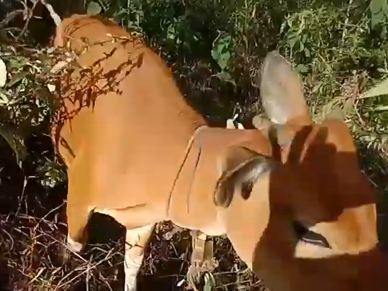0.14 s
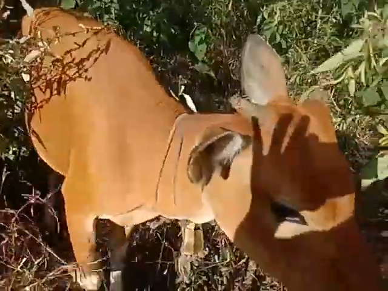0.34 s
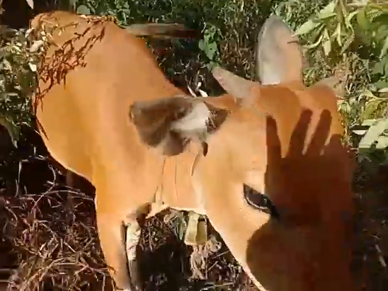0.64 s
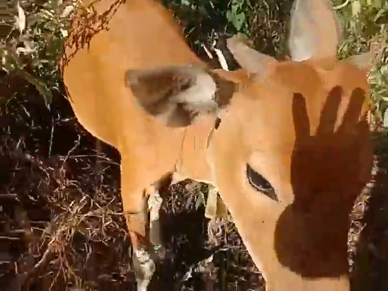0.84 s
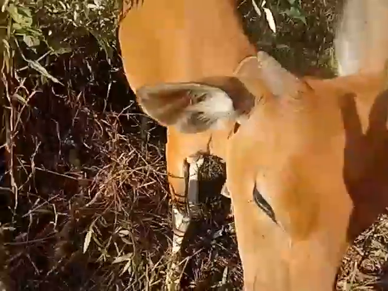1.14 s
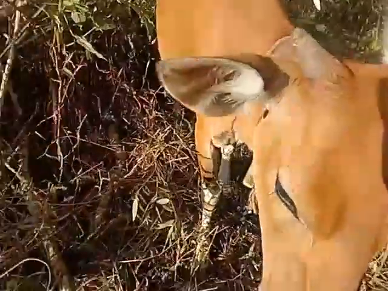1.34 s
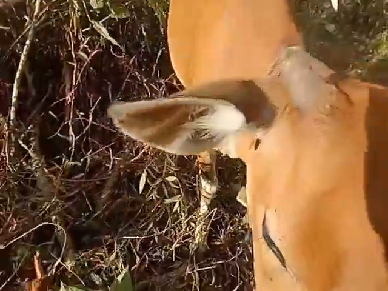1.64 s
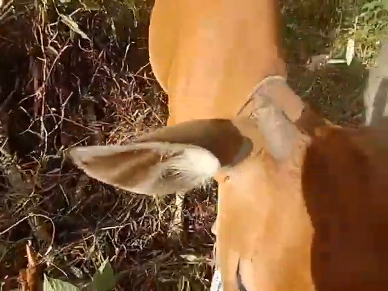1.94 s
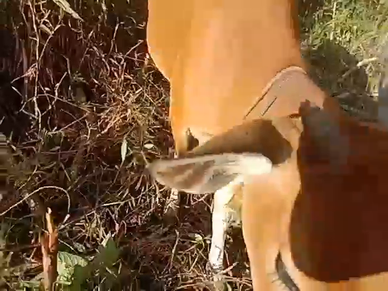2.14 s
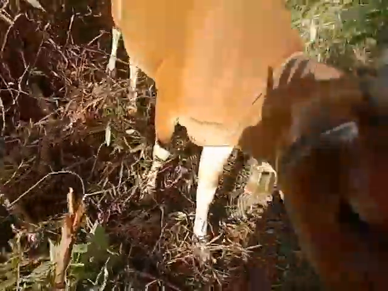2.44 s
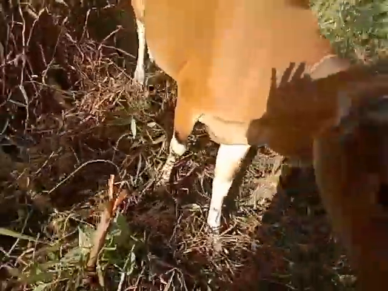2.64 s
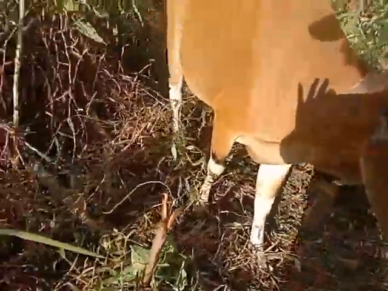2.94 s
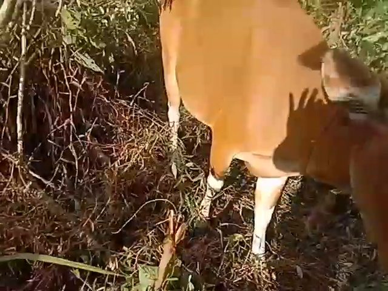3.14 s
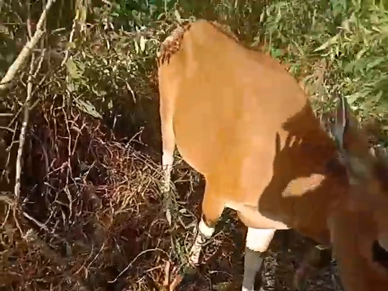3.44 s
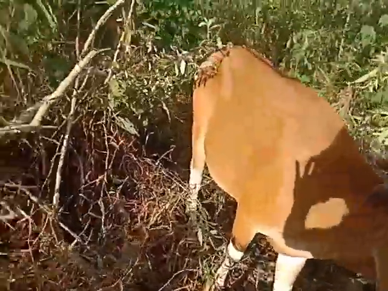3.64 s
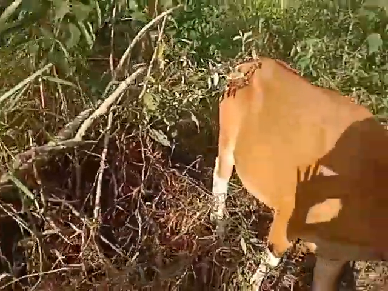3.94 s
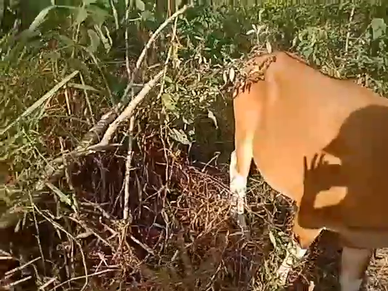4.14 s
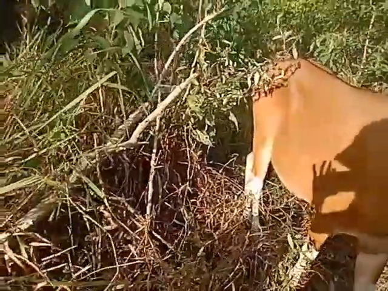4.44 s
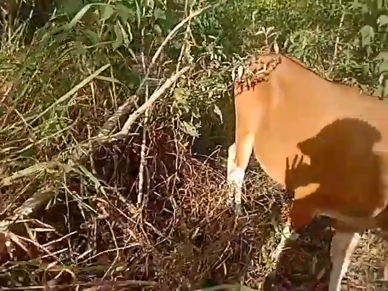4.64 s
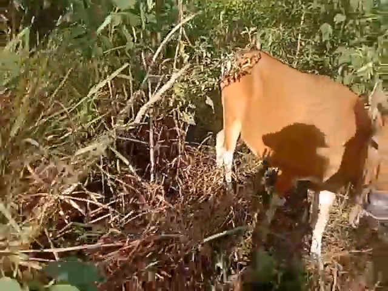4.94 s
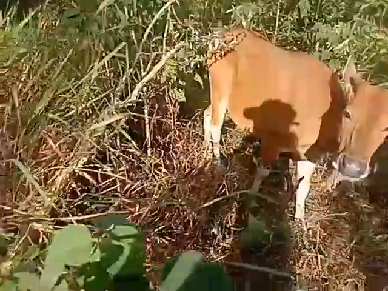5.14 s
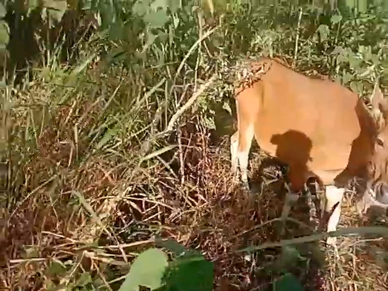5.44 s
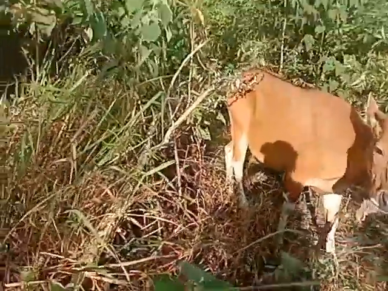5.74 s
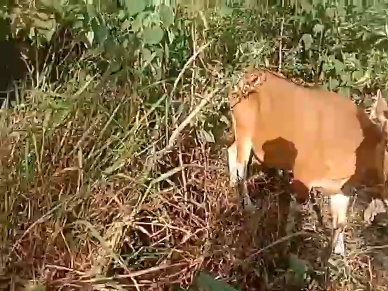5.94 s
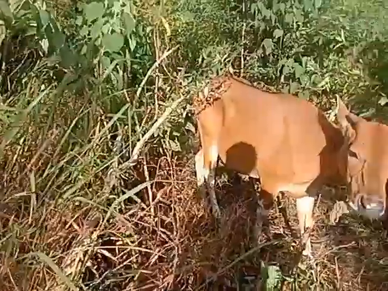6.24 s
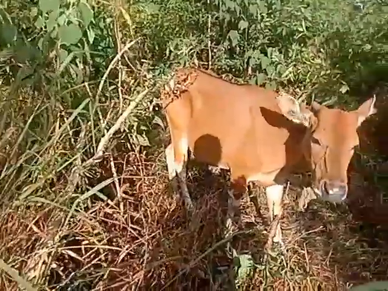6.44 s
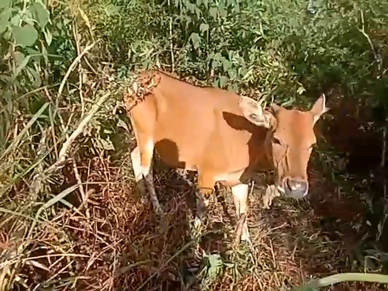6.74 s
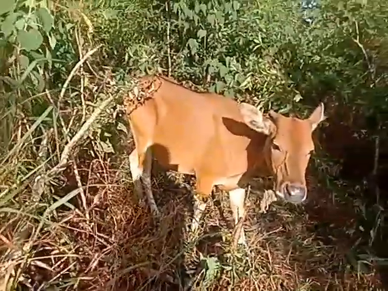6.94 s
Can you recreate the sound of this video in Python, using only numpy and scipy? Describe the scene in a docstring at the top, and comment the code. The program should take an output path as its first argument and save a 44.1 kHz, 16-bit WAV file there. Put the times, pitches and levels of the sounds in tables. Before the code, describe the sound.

A cow tugs at dry scrub, leaves swishing and stems snapping close by, over droning cicadas and a steady low hum.

```python
"""Leaves swish, stems crackle and snap, and a hoof thuds as a cow browses in dry scrub close by.
Cicadas drone all around, a low hum runs throughout, a far engine nearly holds its pitch and then slows,
and a bird whistles faintly. Plant sounds are noise and tiny clicks, shaped by filters and by each pull.
The hum, engine and bird are sine waves. The cicadas are a hiss of noise plus pulsed tones.
Rumble, air and a thin whine are filtered noise."""
import sys
import numpy as np
from scipy import signal
from scipy.fft import rfft, irfft, next_fast_len
from scipy.io import wavfile

SR = 44100
rng = np.random.default_rng(int(sys.argv[2]) if len(sys.argv) > 2 else 0)


def store_wav(level_fs):
    """Save 16-bit WAV to argv[1]."""
    pcm = np.round(np.clip(np.atleast_2d(level_fs), -1, 1) * 32767)
    wavfile.write(sys.argv[1], SR, pcm.T.astype(np.int16))


N = 313242
TIME = np.arange(N) / SR  # seconds

# In every spectrum table, each row: frequency in Hz, relative level in dB.
# The cow pulls at or pushes through the scrub. Each row: start in seconds, length in seconds,
# then relative levels in dB of leaves, stems and branches.
PULLS = [(-0.05, 0.063, -62, -63, -65), (0.05, .19, -54, -53, -62), (0.304, 0.22, -53.5, -57.5, -55),
         (0.484, 0.13, -47, -49, -62), (0.688, 0.048, -44, -41, -68), (1.308, .16, -57, -59, -61),
         (1.493, .12, -55, -50.5, -57), (1.604, 0.2, -50.5, -45.5, -58), (1.842, 0.15, -50, -49.5, -66),
         (1.978, 0.26, -53, -57.5, -64), (2.246, 0.14, -54.5, -52.5, -58), (2.403, .06, -55, -58, -58),
         (2.464, 0.43, -57, -58, -57), (3.074, 0.15, -53.5, -60.5, -60), (3.42, 0.13, -72, -58.5, -51),
         (3.556, 0.18, -52, -48, -45.5), (3.979, 0.063, -54, -50, -54), (4.062, 0.067, -53, -55.5, -55),
         (4.137, 0.34, -84, -82, -60.5), (4.628, 0.16, -77, -61.5, -57.5), (4.768, 0.12, -61, -54.5, -54.5),
         (4.965, 0.16, -50.5, -49.5, -53.5), (5.098, 0.071, -62, -43, -54),
         (5.206, 0.11, -53.5, -54.5, -56), (5.464, 0.14, -64, -61, -58), (5.574, 0.08, -49, -46.5, -62),
         (5.869, 0.1, -64, -60, -59), (6.43, 0.1, -61, -65, -78)]
# The scrub between pulls. One row: relative levels in dB of leaves, stems and branches.
REST_DB = (-74.5, -78, -59.5)
# Every pull takes hold, builds as the plant tightens, lets go, and leaves the bush swaying.
GRIP_S, BUILD_DB, RELEASE_S, SWAY_DB, SWAY_S = 0.023, 1, 0.037, -21, 0.43
# Spectra of thin leaves, of stems and of heavy branches.
LEAF_SPECTRUM = [(1500, 1), (4000, 4), (6000, 13), (8200, -2), (9500, 7), (11000, 5), (13700, -2),
                 (15200, 0.5)]
STEM_SPECTRUM = [(300, -48), (700, -10.5), (1300, 0.5), (2200, -2), (3100, -0.5), (3900, -2), (4400, -8.5),
                 (5200, 2.5), (7000, -14), (8500, -18), (15000, -23.5)]
BRANCH_SPECTRUM = [(200, -17), (340, 8), (520, -2), (800, 0), (1200, -3), (2000, -16.5)]
# Stems snapping; the rows from 1.189 to 1.255 s are sharp slips of the twig dragging over wood. # Each row:
# start in seconds, relative peak in dB, pitch in Hz, ring time in seconds, # splinters against the stalk in dB.
SNAPS = [(0.061, -41.5, 3880, 0.019, -8), (0.539, -32, 3780, 0.069, -6), (0.554, -31, 3630, 0.019, 3),
         (0.586, -33, 1300, 0.09, 19), (0.76, -31.5, 2990, 0.025, -11), (0.764, -32, 3420, 0.042, -12),
         (0.775, -31, 2860, 0.034, 3), (0.962, -46.5, 900, 0.021, 18), (1.189, -36, 1480, 0.018, -6),
         (1.212, -41, 2230, 0.04, -5), (1.215, -41.5, 1350, 0.11, -7), (1.243, -42, 1320, 0.059, -8),
         (1.255, -43, 1320, 0.024, -12), (1.675, -36.5, 3180, 0.049, -8), (1.77, -32, 1250, 0.03, 3),
         (1.773, -32.5, 3150, 0.033, -14), (1.777, -27, 1260, 0.0081, -3), (1.785, -31.5, 3100, 0.042, 1),
         (1.879, -36.5, 4060, 0.2, -8), (1.913, -40.5, 1790, 0.085, -11), (2.095, -41.5, 2980, 0.027, -10),
         (4.024, -42, 3300, 0.098, -8), (5.157, -31, 1530, 0.03, 13), (5.646, -39, 1280, 0.04, -6),
         (5.65, -31, 2190, 0.021, -4), (6.581, -43, 2720, 0.018, -11), (6.61, -46.5, 3200, 0.03, -5),
         (6.754, -45, 1240, 0.045, -3), (7.065, -50, 1410, 0.037, -4)]
# Dry leaves ticking. Each row: start in seconds, relative peak in dB, lower crack against the tick in dB.
TICKS = [(0.087, -48, 10.5), (0.619, -35.5, 0), (0.8624, -51, -7), (0.8905, -42.5, -15), (2.923, -39, -8),
         (3.186, -44, -5), (3.481, -51, -6), (3.924, -44, 7.5), (4.103, -39, 0.5), (5.0045, -45, -11),
         (5.3394, -47.5, 2), (5.4328, -51, 2), (5.514, -46, -22), (5.918, -45, -10), (6.326, -56, -9),
         (6.772, -56, -3), (7.022, -42, -16)]
# Dull knocks of wood. Each row: start in seconds, relative peak in dB, pitch in Hz, ring time in seconds.
KNOCKS = [(0.276, -46, 323, 0.09), (0.455, -47, 338, 0.096), (0.82, -42.5, 428, 0.046),
          (2.418, -43.5, 890, 0.051), (3.43, -47, 340, 0.098), (3.924, -24.5, 750, 0.012),
          (5.651, -42, 754, 0.046)]
# A twig dragging over wood: from when to when, how loud, how it fades.
SCRAPE_START_S, SCRAPE_END_S = 1.188, 1.268
SCRAPE_DB, SCRAPE_FADE_DB_PER_S = -50, 80
# A hoof pressing into the litter: when it lands, how it loads and fades, and its spectrum.
HOOF_S, HOOF_RISE_S, HOOF_HOLD_S = 5.125, 0.034, 0.04
HOOF_DB, HOOF_FADE_DB_PER_S = -40.5, 192
HOOF_SPECTRUM = [(100, -9), (220, 0), (300, 3), (390, -2.5), (500, -18), (900, -43)]
# Nearer cicadas. Each row: tymbal clicks a second, pitch in Hz, width in Hz, level in dB at the start,
# level in dB at the end.
CICADAS = [(91.6, 6600, 330, -70, -53), (102.5, 6800, 550, -52.5, -59), (84.9, 7050, 320, -57, -59.5),
           (91.9, 5750, 450, -56, -63)]
# Cicada chorus. Each row: time in seconds, relative level in dB; then its spectrum.
CHORUS_LEVEL = [(0.0, -44.5), (3.44, -46), (3.66, -44.5), (4.41, -47), (4.53, -45), (7.08, -45), (7.1, -45)]
CHORUS_SPECTRUM = [(3500, -74), (4600, -24.5), (5050, -15), (5350, -7), (5650, -1.5), (5950, -0.5),
                   (6220, -7), (6550, 4.5), (6850, -5.5), (7150, -2), (7450, -3.5), (7750, -13),
                   (8200, -25.5), (9500, -81)]
# Low hum and its central pitch. Each row: time in seconds, level in dB.
HUM_LEVEL = [(0.0, -36), (0.45, -32.5), (0.65, -35.5), (1.82, -32.5), (1.98, -35.5), (2.29, -31.5),
             (2.61, -36), (2.67, -32.5), (3.52, -33), (3.6, -30.5), (3.89, -34.5), (4.11, -32.5),
             (5.63, -32.5), (5.77, -30.5), (6.09, -33), (7.1, -31.5)]
HUM_HZ = 75.07
# Far engine. Each row: time in seconds, pitch in Hz, level in dB.
ENGINE = [(2.4, 178, -68), (3.3, 176.7, -57.5), (4.1, 175.3, -69.5), (4.7, 174.8, -51.5), (5.1, 174.3, -62),
          (5.5, 164.5, -49.5), (5.8, 140.2, -46), (6.05, 134, -49), (6.4, 120.5, -80)]
# A far bird. Each row: start in seconds, length in seconds, pitch in Hz, level in dB.
CHIRPS = [(5.778, 0.079, 3340, -75), (6.186, 0.062, 3100, -69), (6.52, 0.11, 2700, -67),
          (6.917, 0.069, 3340, -70)]
# Distant rumble. Each row: time in seconds, level in dB; then its spectrum.
RUMBLE_LEVEL = [(0, -52), (4.6, -53), (5.8, -50), (6.3, -49.5), (7.1, -48)]
RUMBLE_SPECTRUM = [(20, -28), (36, -4), (60, -45), (90, 11), (125, 8.5), (160, 5.5), (200, -5.5),
                   (300, -49.5)]
# Spectrum of still air.
AIR_SPECTRUM = [(20, -65), (220, 8.5), (330, 2), (480, 4.5), (750, -1.5), (1100, -6), (2000, -7),
                (3200, -5), (4400, -11), (8500, -57), (11000, -43), (12500, -35), (13800, -40),
                (15100, -50)]
# Microphone port resonances. Each row: frequency in Hz, width in Hz, lift in dB.
PORT = [(1273, 62, 4.5), (15200, 270, 11.5)]
EDGE_HZ = 15530  # almost nothing sounds above this frequency


def amp(db):
    """Turns decibels into a gain."""
    return 10 ** (np.asarray(db) / 20)


def unit(x):
    """Scales a sound to an average strength (rms) of one."""
    return x / np.sqrt(np.mean(x ** 2) + 1e-20)


def peaked(x):
    """Scales a sound to a peak of one."""
    return x / abs(x).max()


def curve(rows, column=1):
    """Reads one column of a time table at every sample, with straight lines between rows."""
    rows = np.asarray(rows)
    return np.interp(TIME, rows[:, 0], rows[:, column])


def noise():
    """White noise."""
    return rng.standard_normal(N)


def drift(rate):
    """Slow random motion of rms one, up to about rate changes a second."""
    white = rng.standard_normal(8192)
    f = np.fft.rfftfreq(len(white), TIME[-1] / len(white))
    slow = irfft(rfft(white) * np.exp(-(f / rate) ** 2))
    return unit(np.interp(TIME, np.linspace(0, TIME[-1], len(slow)), slow))


def colour(x, spectrum):
    """Filters a sound by a spectrum table."""
    hz, db = np.transpose(spectrum)
    size = next_fast_len(len(x) + SR // 10)
    f = np.fft.rfftfreq(size, 1 / SR)
    gain = amp(np.interp(np.log(f + 1), np.log(hz), db))
    return irfft(rfft(x, size) * gain, size)[:len(x)]


def band(x, hz, width):
    """Keeps a bell-shaped band with steep skirts."""
    size = next_fast_len(len(x), True)
    f = np.fft.rfftfreq(size, 1 / SR)
    bell = np.exp(-((f - hz) / width) ** 2)
    return irfft(rfft(x, size) * bell, size)[:len(x)]


def resonate(x, hz, width):
    """Rings one damped resonance."""
    pole = np.exp((-np.pi * width + 2j * np.pi * hz) / SR)
    return signal.lfilter([1], [1, -pole], x).imag


def high_pass(x, order, hz):
    """Takes away what lies below a frequency."""
    return signal.sosfilt(signal.butter(order, hz, "highpass", fs=SR, output="sos"), x)


def add(mix, s, sound):
    """Mixes a sound in at time s."""
    part = mix[max(round(s * SR), 0):][:len(sound)]
    part += sound[:len(part)]


def dying(t60):
    """An eighth of a second of decay that falls by 60 dB in t60 seconds."""
    return np.exp(-np.log(1000) * TIME[:SR // 8] / t60)


def burst(t60):
    """A puff of fibres breaking: noise that dies away."""
    return rng.standard_normal(SR // 8) * dying(t60)


def crackle(per_s, spread_db, clump_db, wash):
    """Tiny fractures of uneven size, coming in clumps, over a smooth rubbing noise."""
    sizes = amp(spread_db * np.minimum(rng.exponential(1, N), 3))
    happens = rng.random(N) < per_s / SR
    clicks = sizes * rng.choice([-1, 1], N) * happens
    clumps = amp(clump_db * drift(31))
    return unit((unit(clicks) + wash * noise()) * clumps)


def patchy(x, depth_db, span_hz, span_s):
    """Lets random patches of pitch and time stand out, each about span_hz by span_s in size."""
    size, hop = 1024, 128  # samples
    z = signal.stft(x, nperseg=size, noverlap=size - hop)[2]
    field = rng.standard_normal(z.shape)
    # smooth the random field along frequency, then along time
    for axis, span in enumerate([span_hz * size / SR, span_s * SR / hop]):
        kernel = np.exp(-(2 * np.arange(-40, 41) / span) ** 2)
        kernel = np.expand_dims(kernel, 1 - axis)
        field = signal.fftconvolve(field, kernel, "same", axes=axis)
    patches = z * amp(depth_db * unit(field))
    return unit(signal.istft(patches, nperseg=size, noverlap=size - hop)[1][:N])


def pull(t, length):
    """Strength of one pull, t seconds after its start: grip, build, release, sway."""
    held = np.clip(t / length, 0, 1)
    after = np.maximum(t - length, 0)
    grip = (1 + np.tanh(t / GRIP_S - 0.5)) / 2
    let_go = np.exp(-after / RELEASE_S) + amp(SWAY_DB) * np.exp(-after / SWAY_S)
    return grip * amp(BUILD_DB * held) * let_go


def stirring():
    """How hard leaves, stems and branches move: the pulls add in power to the resting scrub."""
    t = TIME[::64]  # a coarse grid is enough for slow motion
    power = 0
    for start, length, *levels_db in PULLS:
        power = power + np.outer(amp(levels_db), pull(t - start, length)) ** 2
    motions = []
    for part, rest_db in zip(power, REST_DB):
        motions.append(np.interp(TIME, t, np.sqrt(part + amp(rest_db) ** 2)))
    return np.array(motions)


def foliage(leaf_db=-3, stem_db=-2, branch_db=-4, jerk_db=1.5):
    """Leaves brush, stems crackle and branches scrape as the cow pulls at them in small jerks."""
    leaves = crackle(per_s=2200, spread_db=4.5, clump_db=1.5, wash=1.0)
    leaves = patchy(leaves, depth_db=1.0, span_hz=600, span_s=0.0083)
    stems = crackle(per_s=1100, spread_db=3.5, clump_db=1.5, wash=0.55)
    stems = patchy(stems, depth_db=3.2, span_hz=480, span_s=0.018)
    branches = crackle(per_s=500, spread_db=0.5, clump_db=1, wash=0.74)
    branches = patchy(branches, depth_db=4.5, span_hz=121, span_s=0.021)
    leaf_motion, stem_motion, branch_motion = stirring() * amp(jerk_db * drift(14.7))
    return (amp(leaf_db) * leaf_motion * unit(colour(leaves, LEAF_SPECTRUM))
            + amp(stem_db) * stem_motion * unit(colour(stems, STEM_SPECTRUM))
            + amp(branch_db) * branch_motion * unit(colour(branches, BRANCH_SPECTRUM)))


def snaps(gain_db=2, break_share=0.98, low_cut_hz=650):
    """A stem gives way, or the dragged twig slips: the fibres ring the stalk and throw off broad splinters."""
    out = np.zeros(N)
    for s, db, hz, t60, splinter_db in SNAPS:
        width = 0.28 * hz
        stalk = resonate(burst(t60 * break_share), hz, width)
        stalk = peaked(resonate(stalk, hz, width))
        splinters = peaked(colour(burst(t60), STEM_SPECTRUM))
        add(out, s, amp(gain_db + db) * peaked(stalk + amp(splinter_db) * splinters))
    # thin stalks radiate almost no bass
    return high_pass(out, 4, low_cut_hz)


def ticks(gain_db=3, t60=0.06, crack_hz=5200, crack_width=1500):
    """A dry leaf buckles with a thin, bright tick and a lower crack."""
    out = np.zeros(N)
    for s, db, crack_db in TICKS:
        tick = peaked(colour(burst(t60), LEAF_SPECTRUM))
        crack = peaked(resonate(burst(t60), crack_hz, crack_width))
        add(out, s, amp(gain_db + db) * (tick + amp(crack_db) * crack))
    return out


def knocks(gain_db=3, upper=1.17, upper_db=-5, scatter_db=-18, scatter_t60=0.34, low_cut_hz=320):
    """Wood struck dully: two damped modes and a short scatter from the brush."""
    out = np.zeros(N)
    t = TIME[:SR // 8]
    for s, db, hz, t60 in KNOCKS:
        modes = np.sin(2 * np.pi * hz * t) + amp(upper_db) * np.sin(2 * np.pi * hz * upper * t)
        scatter = amp(scatter_db) * peaked(colour(burst(scatter_t60), BRANCH_SPECTRUM))
        add(out, s, amp(gain_db + db) * (peaked(modes * dying(t60)) + scatter))
    return high_pass(out, 2, low_cut_hz)


def scrape(hz=1330, width=330, upper_hz=2200, upper_width=900, upper_db=-2):
    """A twig drags over wood in quick, uneven slips that ring two resonances."""
    slips = crackle(per_s=273, spread_db=2.5, clump_db=0.5, wash=1.0)
    ring = unit(band(slips, hz, width)) + amp(upper_db) * unit(band(slips, upper_hz, upper_width))
    dragging = (TIME > SCRAPE_START_S) & (TIME < SCRAPE_END_S)
    since = np.maximum(TIME - SCRAPE_START_S, 0)
    return amp(SCRAPE_DB - SCRAPE_FADE_DB_PER_S * since) * dragging * unit(ring)


def hoof():
    """A quick run of low thumps as the litter gives under weight."""
    since = TIME - HOOF_S
    fading = np.maximum(since - HOOF_RISE_S - HOOF_HOLD_S, 0)  # seconds
    weight = np.clip(since / HOOF_RISE_S, 0, 1) * amp(HOOF_DB - HOOF_FADE_DB_PER_S * fading)
    thumps = crackle(per_s=340, spread_db=2.5, clump_db=0.5, wash=0.55)
    return weight * unit(colour(thumps, HOOF_SPECTRUM))


def whine(start_db=-63, end_db=-69, follow_db=-14, hz=1262, width=80, flicker_db=3):
    """A thin, breathy note that flickers, and swells when the stems move."""
    stem_motion = stirring()[1]
    steady = amp(np.linspace(start_db, end_db, N))
    level = np.hypot(steady, amp(follow_db) * stem_motion)
    return level * unit(band(noise(), hz, width) * amp(flicker_db * drift(14.5)))


def cicadas(chorus_db=-3, flutter_db=0.67, click_share=0.26, rate_jitter=0.0022, uneven_db=1.5):
    """Each tymbal buckle rings a near insect's body; far ones merge into a hiss."""
    far = patchy(noise(), depth_db=2.0, span_hz=101, span_s=0.056)
    chorus_level = amp(chorus_db + curve(CHORUS_LEVEL) + flutter_db * drift(37))
    out = chorus_level * unit(colour(far, CHORUS_SPECTRUM))
    for rate, hz, width, start_db, end_db in CICADAS:
        turns = np.cumsum(rate * (1 + rate_jitter * drift(2.13))) / SR
        # each buckle starts at once and dies away over a share of the turn
        buckles = np.exp(-(turns % 1) / click_share) * amp(uneven_db * drift(79))
        # the body's pitch wanders, so no two buckles ring quite alike
        pitch = hz + width / 2 * drift(150.6)
        carrier = np.sin(2 * np.pi * np.cumsum(pitch) / SR)
        song = band(buckles * carrier, hz, width)
        out += amp(np.linspace(start_db, end_db, N)) * unit(song)
    return out


def hum(sway_db=0.47, waver_db=0.8, wobble=0.15):
    """A nearly pure low tone; its level sways and wavers, its phase wobbles (in radians)."""
    phase = 2 * np.pi * HUM_HZ * TIME + wobble * drift(7.4)
    level = amp(curve(HUM_LEVEL) + sway_db * drift(7) + waver_db * drift(37))
    return level * unit(np.sin(phase))


def engine(under_db=-3, over_db=-14, cruise_hz=168, slow_hz=143, flutter_db=3.0, fade_s=0.19):
    """A far exhaust: one strong order; the one below it grows as the engine slows."""
    hz = curve(ENGINE)
    phase = 2 * np.pi * np.cumsum(hz) / SR
    slowing = np.clip((cruise_hz - hz) / (cruise_hz - slow_hz), 0, 1)
    under = slowing * amp(under_db) * np.sin(phase * 4 / 5)
    over = amp(over_db) * np.sin(phase * 6 / 5)
    orders = np.sin(phase) + under + over
    # fades in just before the first row and out just after the last
    inside = np.minimum(TIME - ENGINE[0][0], ENGINE[-1][0] - TIME)
    heard = np.clip(1 + inside / fade_s, 0, 1)
    return amp(curve(ENGINE, column=2) + flutter_db * drift(9.6)) * heard * unit(orders)


def bird(sag=0.017, waver=0.012):
    """Faint whistles that waver and sink slightly in pitch."""
    out = np.zeros(N)
    for s, length, hz, db in CHIRPS:
        n = int(length * SR)
        pitch = hz * (1 + sag * np.linspace(0.5, -0.5, n) + waver * drift(150)[:n])
        whistle = np.hanning(n) * np.sin(2 * np.pi * np.cumsum(pitch) / SR)
        add(out, s, amp(db) * unit(whistle))
    return out


def background(air_db=-62):
    """Distant rumble and the soft, uneven hiss of open air, both filtered noise."""
    rumble = amp(curve(RUMBLE_LEVEL)) * unit(colour(noise(), RUMBLE_SPECTRUM))
    air = patchy(noise(), depth_db=3.5, span_hz=170, span_s=0.057)
    return rumble + amp(air_db) * unit(colour(air, AIR_SPECTRUM))


def scene():
    """Everything reaches one microphone, alike in both channels."""
    cow = foliage() + snaps() + ticks() + knocks() + scrape() + hoof()
    mix = cow + whine() + cicadas() + hum() + engine() + bird() + background()
    return np.array([mix, mix])


def record(dry):
    """The microphone port rings at its resonances; then a steep low-pass filter cuts the top."""
    out = dry
    for hz, width, lift_db in PORT:
        b, a = signal.iirpeak(hz, hz / width, fs=SR)
        out = out + (amp(lift_db) - 1) * signal.lfilter(b, a, out)
    low_pass = signal.firwin(1401, EDGE_HZ, window=("kaiser", 9), fs=SR)
    return signal.oaconvolve(out, low_pass[None], "same")


dry = scene()
out = record(dry)
store_wav(out)
```